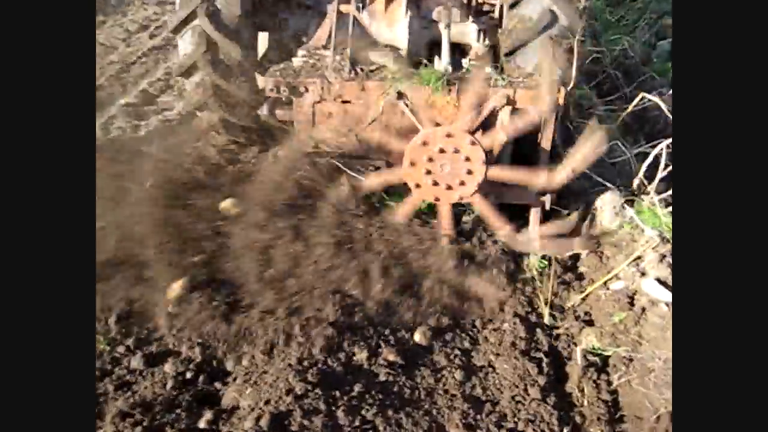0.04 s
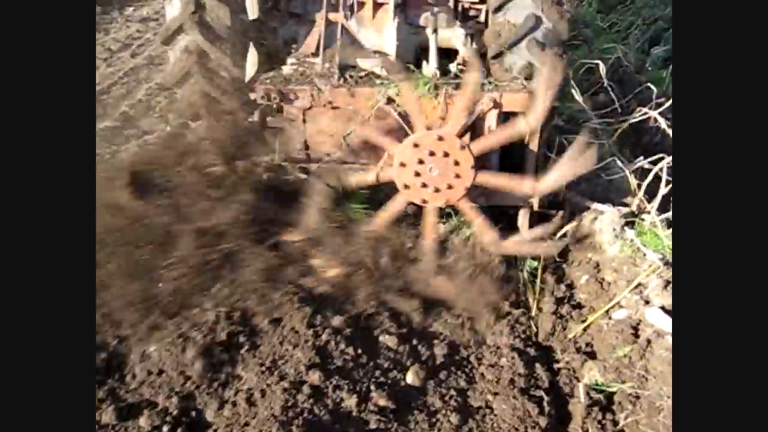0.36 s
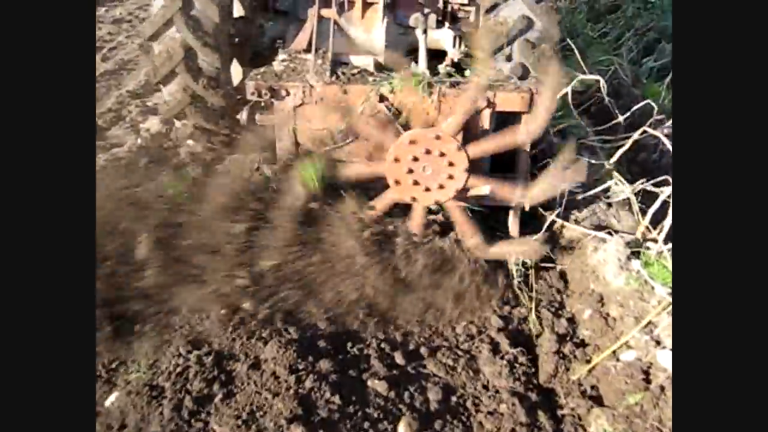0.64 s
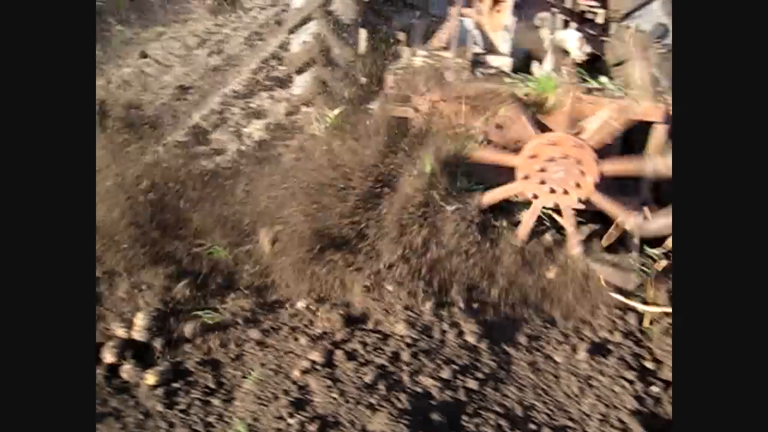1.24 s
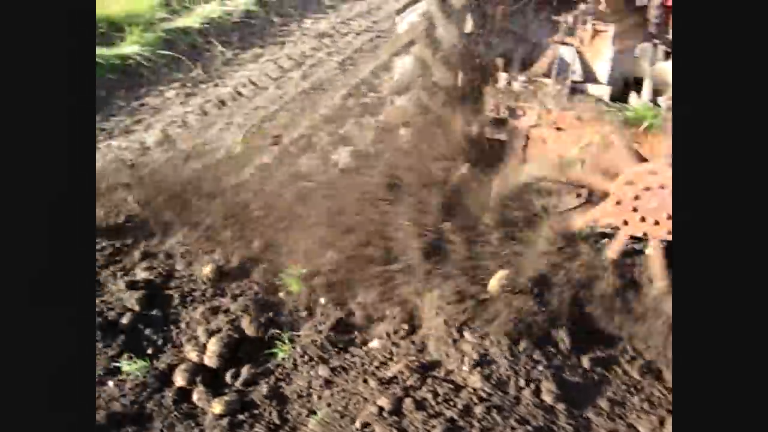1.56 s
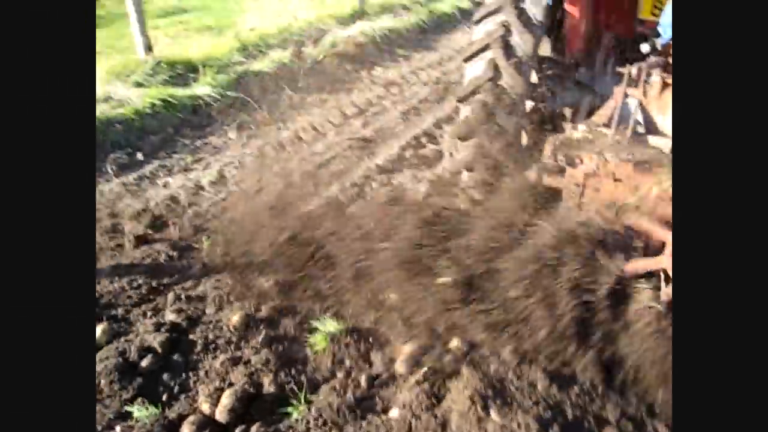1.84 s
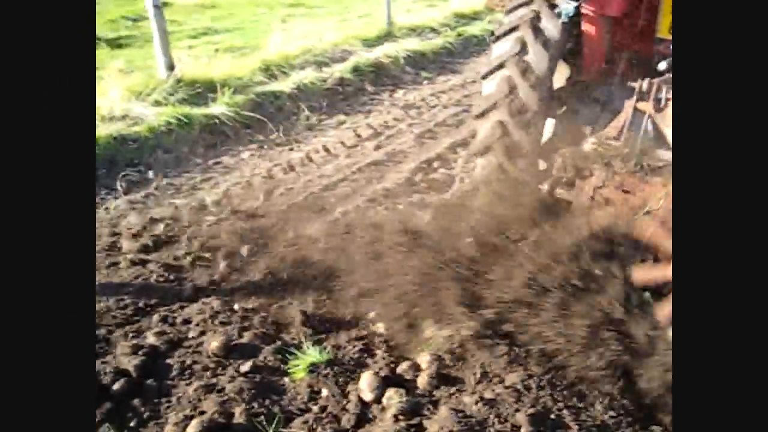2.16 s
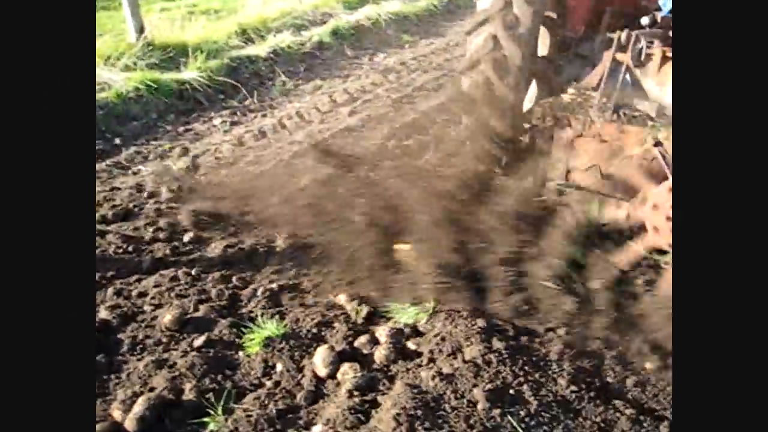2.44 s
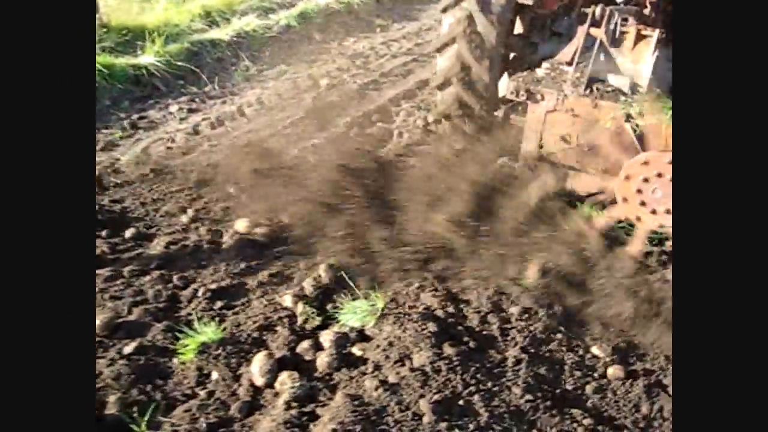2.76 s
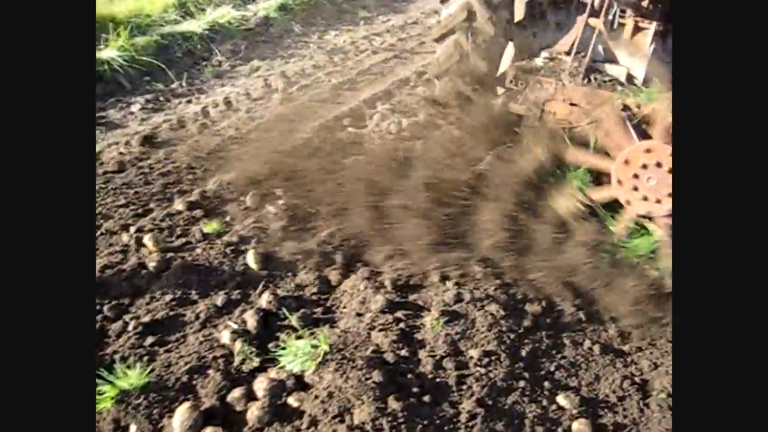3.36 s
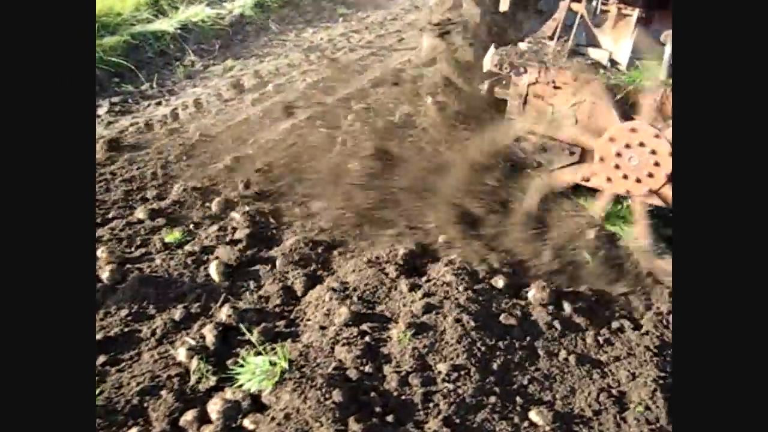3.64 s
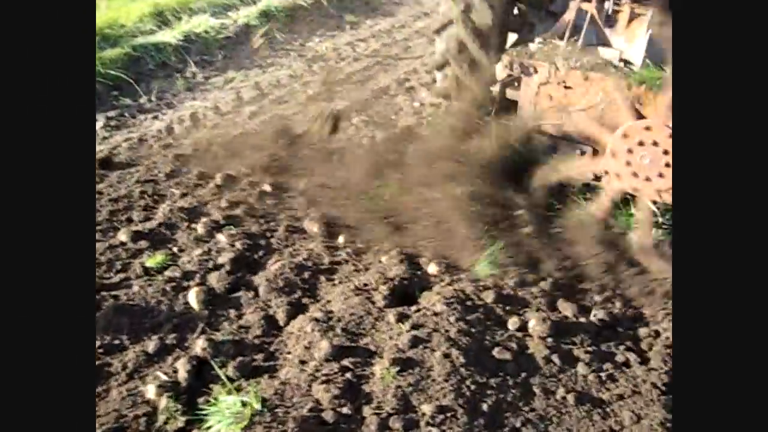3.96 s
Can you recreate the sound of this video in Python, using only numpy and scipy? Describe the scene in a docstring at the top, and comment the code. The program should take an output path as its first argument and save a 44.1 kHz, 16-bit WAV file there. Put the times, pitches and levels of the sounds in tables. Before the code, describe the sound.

A spinning potato digger clatters close by in an open field, throwing showers of soil while stones clack sharply against its steel tines. The tractor engine runs evenly underneath, and the metal frame booms irregularly throughout.

```python
"""An evenly running engine and a shower of earth, close by: a tractor pulls a potato spinner along a ridge.
The exhaust sounds harmonics of the firing rate; thrown soil is the sum of countless small impacts.
The tines bite the ridge and excite the frame's low modes, gravel ticks, stones clack on the steel wheel
and clods burst. A limiter ducks the whole scene after every hard clack."""
import sys
import numpy as np
from scipy import signal
from scipy.fft import rfft, irfft
from scipy.io import wavfile

SR = 44100
rng = np.random.default_rng(int(sys.argv[2]) if len(sys.argv) > 2 else 0)


def generate_wav(signal):
    """Clip the signal to [-1, 1] and save it as 16-bit WAV at the path in sys.argv[1]."""
    frames = np.transpose(np.atleast_2d(signal))
    scaled = np.clip(frames, -1, 1) * 32767
    pcm = np.round(scaled).astype(np.int16)
    wavfile.write(sys.argv[1], SR, pcm)


N = 176400
TIME = np.arange(N) / SR


def from_db(db):
    """Amplitude ratio of a level in decibels."""
    return 10 ** (np.asarray(db) / 20)


def rms_one(x):
    """Normalisation to unit rms."""
    return x / np.sqrt(np.mean(x ** 2) + 1e-20)


def in_time(rows):
    """Linear interpolation of each column over time."""
    s, *columns = np.transpose(rows)
    return [np.interp(TIME, s, c) for c in columns]


def coloured(x, spectrum):
    """Spectral shaping, with a roll-off beyond both ends; unit rms."""
    hz, db = np.transpose(spectrum)
    f = np.maximum(np.arange(N // 2 + 1) * SR / N, 1)
    edges = 1 / np.sqrt((1 + (hz[0] / 2 / f) ** 4) * (1 + (f / hz[-1] / 2) ** 4))
    gain = from_db(np.interp(np.log(f), np.log(hz), db))
    return rms_one(irfft(rfft(x) * edges * gain, N))


def drift(hz):
    """Low-passed noise: a slow random fluctuation of unit rms."""
    r = np.exp(-80 * np.pi * hz / SR)  # computed at SR / 40
    slow = signal.lfilter([1], [1, -2 * r, r * r], rng.standard_normal(N // 40 + 2002))[2000:]
    return np.interp(np.arange(N) / 40, np.arange(len(slow)), rms_one(slow))


def fade(t, t60):
    """Exponential decay, 60 dB in t60 seconds."""
    return np.exp(-np.log(1000) * t / t60)


def ring(x, hz, t60):
    """Forced vibration of one damped mode."""
    r, w = fade(1 / SR, t60), 2 * np.pi * hz / SR
    return signal.lfilter([0, np.sin(w)], [1, -2 * r * np.cos(w), r * r], x)


def struck(modes, t, spread_db):
    """Free vibration after a blow: damped modes of random strength and sign."""
    hz, db, t60 = np.transpose(modes)[:, :, None]
    gain = from_db(db + spread_db * rng.standard_normal(hz.shape)) * rng.choice([-1, 1], hz.shape)
    return np.sum(gain * np.sin(2 * np.pi * hz * t) * fade(t, t60), axis=0)


def add(out, s, sound):
    """Superpose a sound starting at s seconds."""
    i = int(np.clip(s * SR, 0, N - 1))
    out[i:i + len(sound)] += sound[:N - i]


def smooth(x, seconds):
    """First-order lag."""
    r = np.exp(-1 / (seconds * SR))
    return signal.lfilter([1 - r], [1, -r], x)


def engine():
    """Periodic excitation: the firings give exhaust harmonics and one burst of clatter each."""
    # engine speed: (time [s], firing rate [Hz])
    firing = [(0, 33.72), (1.6, 33.74), (2.3, 33.62), (3.65, 33.75), (4, 34.1)]
    # exhaust harmonics: (multiple of the firing rate, rms level [dB])
    exhaust = [(1, -44), (2, -25), (3, -28.5), (4, -34), (5, -43), (6, -36), (7, -34.5), (8, -35),
               (9, -37.5), (11, -37), (12, -55), (13, -40), (14, -29), (15, -49.5), (20, -63)]
    # combustion clatter: (frequency [Hz], relative density [dB])
    knock = [(100, 19), (250, -17), (700, 13), (1500, -29.5), (3000, 40), (8000, 19)]
    cycles = np.cumsum(in_time(firing)[0]) / SR
    tone = np.zeros(N)
    for k, db in exhaust:
        amplitude = np.sqrt(2) * from_db(db + 2.5 * drift(hz=11.6))
        tone += amplitude * np.sin(2 * np.pi * (k * cycles + rng.random()))
    bursts = rng.standard_normal(N) * np.exp(-1.4 * (cycles % 1))
    return tone + from_db(-30.5) * coloured(bursts, knock)


def crumbs(spectrum, per_s=5000):
    """Shot noise: random impacts of uneven size over a wash of fine dust."""
    sizes = from_db(3.6 * np.minimum(rng.exponential(1, N), 5)) * rng.choice([-1, 1], N)
    impacts = rms_one(sizes * (rng.random(N) < per_s / SR))
    dust = 0.43 * rng.standard_normal(N)
    return coloured(impacts + dust, spectrum)


def earth(thud_db, spray_db, grit_db):
    """Amplitude modulation: thuds, spray and grit surge as the wheel throws the soil unevenly."""
    # falling clods, crumbs and grit: (frequency [Hz], relative density [dB])
    thud_spectrum = [(20, -6), (35, 7), (55, -7), (120, 1.5), (180, 3), (260, 5.5), (335, -19.5), (410, 7),
                     (560, 4), (850, 4), (1300, 4.5), (2500, -4.5)]
    spray_spectrum = [(400, -26.5), (900, 1), (1400, 0.5), (2100, 6), (3200, 0), (5000, 1.5), (6300, -9.5),
                      (7500, -12.5), (10000, -52.5)]
    grit_spectrum = [(3000, 2.5), (6000, 6), (7500, 3), (8450, 3.5), (9300, -3.5), (10400, 1.5),
                     (11200, -2.5), (12000, -6), (13500, -1.5), (16000, -35)]
    throw_db = 3.5 * drift(hz=28)
    thuds = from_db(thud_db + 7 + 0.83 * throw_db) * crumbs(thud_spectrum, per_s=900)
    spray = from_db(spray_db - 4.5 + throw_db) * crumbs(spray_spectrum)
    grit = from_db(grit_db + 3 + throw_db + 1.1 * drift(hz=21)) * crumbs(grit_spectrum)
    return thuds + spray + grit


def frame():
    """Resonance: each bite of the tines swells two groups of modes, and the drag keeps them shaking."""
    # tines biting the ridge: (time [s], relative level of low group [dB], of high group [dB])
    bites = [(.068, -3, -14), (.115, -1.5, -26), (.5, -7, -19), (.578, -6, -22), (.615, -20, -24),
             (0.707, -9, -14), (.743, -11, -19), (0.83, -6.5, -14), (1.047, -4.5, -17), (1.479, -8, -15),
             (1.551, -23, -9), (1.689, -9, -9), (1.856, -6.5, -11), (2.036, -16, -9.5),
             (2.106, -13.5, -20.5), (2.408, -12, -15), (2.474, -6.5, -13), (2.685, -8, -2),
             (2.818, -1.5, -8), (2.88, -6.5, -6.5), (2.941, -15, -25), (3.083, -12, -1.5), (3.118, -4, -8),
             (3.276, -14, -12), (3.357, -6, -8), (3.596, -7.5, -13), (3.806, -20, -23), (3.875, -12, -19),
             (3.908, -18.5, -10.5), (3.956, -39, -25)]
    # frame modes: (frequency [Hz], relative level [dB], T60 [s])
    low_modes = [(460.5, -19.5, .13), (479.4, -9, 0.16), (495.7, -8.5, 0.15), (521, -11.5, 0.04)]
    high_modes = [(674, -14, 0.23), (704.3, -5.5, 0.094), (831, -13, 0.071)]
    out, t = np.zeros(N), TIME[:SR // 4]
    rise = 1 - np.exp(-(t / .013) ** 2)
    for s, *levels in bites:
        for modes, bite_db in zip((low_modes, high_modes), levels):
            bend = 1 + 0.0053 * rng.standard_normal()  # the load of soil shifts the pitch
            boom = np.zeros(len(t))
            for hz, db, t60 in modes:
                gain = from_db(db + 2 * rng.standard_normal())
                boom += gain * np.sin(2 * np.pi * hz * bend * t) * rise * fade(t, t60)
            add(out, s, from_db(bite_db + 2) * boom / np.abs(boom).max())
    for modes, shake_db in ((low_modes, -23.5), (high_modes, -24.5)):
        shake = sum(from_db(db) * ring(rng.standard_normal(N), hz, t60) for hz, db, t60 in modes)
        out += from_db(shake_db) * rms_one(shake)
    return out


def gravel(spray_db, per_s=370, count=48):
    """Impulse responses: bits of gravel collide, each tick ringing one of many resonators."""
    # strength of the ticks: (frequency [Hz], relative level [dB])
    spectrum = [(1500, -12.5), (3000, 5.5), (5500, 3), (7500, -0.5), (8500, -5.5), (10500, -9),
                (13000, -20)]
    sizes = from_db(2.7 * np.minimum(rng.exponential(1, N), 4)) * rng.choice([-1, 1], N)
    impacts = sizes * (rng.random(N) < per_s / SR)
    pitches = np.geomspace(1400, 13000, count) * (1 + 0.01 * rng.standard_normal(count))
    gains = from_db(np.interp(pitches, *np.transpose(spectrum)))
    resonator = rng.integers(0, count, N)
    ticks = sum(gains[k] * ring(impacts * (resonator == k) + 1e-18, hz, t60=0.036)
                for k, hz in enumerate(pitches))
    return from_db(spray_db - 7) * rms_one(ticks)


def clacks(hits):
    """Impact of stone on steel: contact noise, a rebound, the stone's partials and the wheel's modes."""
    # contact noise: (frequency [Hz], relative density [dB])
    crack_spectrum = [(300, -19), (900, -15.5), (1800, -5.5), (3200, 2), (5200, -1), (6500, -1),
                      (7600, -13.5), (8500, -8), (10000, -22), (12000, -16.5), (16000, -69)]
    # modes of the steel wheel: (frequency [Hz], relative level [dB], T60 [s])
    wheel_modes = [(1250, -6, 0.098), (1447, -7.5, 0.12), (1778, 2, 0.12), (1964, -2, 0.037),
                   (2500, 3, 0.066), (2984, -1, 0.1), (3617, -21, 0.11), (3900, 5.5, 0.047),
                   (4500, 1, 0.078), (4992, 5, 0.067), (5640, -8, 0.12), (6036, -1, 0.069),
                   (6220, -6.5, 0.029)]
    crack_t60, stone_t60, rebound_s = .034, .026, .0018
    out, t = np.zeros(N), TIME[:SR // 10]
    noise = coloured(rng.standard_normal(N), crack_spectrum)
    onset = int(.003 * SR)  # the first 3 ms set a clack's level
    for s, db, hz in hits:
        start = rng.integers(N - len(t))
        since = t - rebound_s * (.5 + rng.random())
        rebound = from_db(-12) * (since > 0) * fade(np.abs(since), crack_t60 / 2)
        crack = from_db(5.5) * noise[start:start + len(t)] * (fade(t, crack_t60) + rebound)
        cluster_hz = hz * (1 + 0.1065 * rng.standard_normal(3))
        partials = [(hz, 0, stone_t60)] + [(f, -4, stone_t60) for f in cluster_hz]
        stone = from_db(6.5) * struck(partials, t, spread_db=4)
        wheel = from_db(-8.5) * struck(wheel_modes, t, spread_db=5)
        clack = crack + stone + wheel
        add(out, s, from_db(db) * clack / np.std(clack[:onset]))
    return out


def stones():
    """Impulsive excitation: the larger stones strike the tines one by one."""
    # stone impacts: (time [s], relative level [dB], main partial [Hz])
    hits = [(0.004, -2, 5020), (0.0298, 0, 2520), (0.05, -7, 1680), (0.0897, 7, 5500), (0.099, 13, 3520),
            (0.1025, 8, 3750), (0.1406, 2, 3450), (0.1765, 5.5, 5280), (0.2375, 1, 2150),
            (0.2492, 4.5, 4950), (0.268, -6, 3260), (0.312, -3, 3720), (0.344, -2.5, 5050),
            (0.357, -7, 2040), (0.3805, 6.5, 3200), (0.425, 9, 3060), (0.438, 4, 3100), (0.4625, 1, 4160),
            (0.5307, 1, 3900), (0.559, -3, 3380), (0.626, -1.5, 4060), (0.6424, 3.5, 4900),
            (0.6699, 2, 2400), (0.693, 0, 1980), (0.7208, 0, 4910), (0.7826, 6, 4100), (0.8155, -5, 3900),
            (0.827, 1.5, 3880), (0.8485, -2, 6000), (0.8659, 4, 3900), (0.875, 1, 4240),
            (0.8959, 4.5, 4020), (0.9522, 4.5, 4600), (0.957, 7.5, 5620), (1.0271, -3, 2820),
            (1.0385, 3, 4670), (1.1, -0.5, 5000), (1.1488, 4, 4110), (1.207, -2, 3900), (1.2281, 3.5, 4060),
            (1.2635, 3.5, 3060), (1.292, -3.5, 3060), (1.338, -10, 4840), (1.3588, 0.5, 5300),
            (1.4227, 4.5, 3670), (1.449, 4.5, 5260), (1.4995, 2, 4000), (1.513, -30, 2000),
            (1.5314, -3, 4900), (1.5474, 4, 3900), (1.6277, 1, 6030), (1.6412, 6.5, 2920), (1.683, 4, 4600),
            (1.706, 9.5, 5400), (1.7479, 9, 3930), (1.759, -2, 5250), (1.781, 7.5, 3040), (1.813, 0, 1660),
            (1.846, -0.5, 2480), (1.878, -3, 3850), (1.886, 4.5, 4400), (1.9515, -1, 5060),
            (1.9824, 6, 4740), (2.001, 3.5, 2840), (2.02, 2, 5500), (2.039, 3.5, 3880), (2.051, -2, 1790),
            (2.061, 0, 5030), (2.092, -4, 4900), (2.113, -12, 3810), (2.1301, 1, 2500), (2.1475, 4.5, 3700),
            (2.165, 2.5, 6640), (2.2049, 3.5, 2940), (2.2142, -15, 1950), (2.2358, 11, 5240),
            (2.3012, 6.5, 5040), (2.322, -3, 4930), (2.387, 2, 2980), (2.4615, -2, 2240), (2.4818, 3, 5270),
            (2.5341, 3.5, 5460), (2.541, 6, 5830), (2.566, -21, 1800), (2.5885, 1, 5230), (2.625, 0, 5100),
            (2.6708, -19, 5140), (2.6848, 7, 3700), (2.692, 5.5, 4260), (2.758, 1.5, 2380),
            (2.784, -9, 5400), (2.8814, 2.5, 4580), (2.9382, -6, 3230), (2.972, -1.5, 5420),
            (2.999, -1.5, 5000), (3.0228, 6, 2980), (3.048, 6.5, 2500), (3.0854, 5.5, 3470),
            (3.1026, 9, 5680), (3.1707, 8, 2370), (3.189, 2.5, 5050), (3.3039, -0.5, 5300),
            (3.3475, 3.5, 1840), (3.389, -7, 2520), (3.474, -23, 2100), (3.5262, -2.5, 2600),
            (3.541, 2.5, 3900), (3.5565, 2, 2450), (3.58, -0.5, 5140), (3.6017, -5, 3880),
            (3.647, -1, 4100), (3.669, -7.5, 6640), (3.681, -1.5, 5100), (3.7289, -3, 1820),
            (3.769, -11, 5800), (3.839, -23, 4330), (3.8636, -9, 6060), (3.9365, -9.5, 5120)]
    return from_db(-1.5) * clacks(hits)


def pebbles(spray_db, per_s=70, count=400):
    """A Poisson process: small stones rattle through the wheel, their level following the spray."""
    s = np.cumsum(rng.exponential(1, count)) / per_s
    size_db = 4 * np.minimum(rng.standard_normal(count), 2)
    hz = 1700 * 3.6 ** rng.random(count)
    db = np.interp(s, TIME, spray_db) - 8.5 + size_db
    return clacks(np.transpose([s, db, hz])[s < N / SR])


def clods():
    """Fracture: a clod bursts on the tines in a half-sine swell of dull thump and gritty hiss."""
    # bursts: (time [s], thump level [dB], hiss level [dB], duration [s])
    bursts = [(0.243, -16, -33, 0.022), (0.286, -6, -33, 0.021), (0.347, -33, -28, 0.031),
              (1.311, -31, -14, 0.012), (1.365, -38, -11, 0.029), (1.61, -22, -24, 0.027),
              (1.67, -32, -15, 0.015), (2.455, -24, -27, 0.009), (2.98, -20, -29, 0.042),
              (3.277, -13, -16, 0.045), (3.526, -22, -8.5, 0.0088), (3.797, -21.5, -27, 0.067),
              (3.871, -32, -26, 0.026), (3.898, -10.5, -27, 0.028), (3.976, -44, -21, 0.027)]
    # breaking soil: (frequency [Hz], relative density [dB])
    thump_spectrum = [(70, -28), (130, 10), (260, -3), (400, 4), (900, -36), (2000, -11)]
    hiss_spectrum = [(1500, -39), (4000, -7), (8000, 16), (12000, 11.5), (15000, -9)]
    out = np.zeros(N)
    thump, hiss = crumbs(thump_spectrum, per_s=2500), crumbs(hiss_spectrum)
    for s, thump_db, hiss_db, duration in bursts:
        swell = np.sin(np.pi * np.clip((TIME - s) / duration, 0, 1))
        out += swell * (from_db(thump_db) * thump + from_db(hiss_db) * hiss)
    return out


def scene():
    """Superposition in a free field: all sources add in one channel, without reflections."""
    # flying earth: (time [s], relative level of thuds [dB], of spray [dB], of grit [dB])
    earth_levels = [(0, -34.5, -17.5, -40), (.14, -17, -5, -30), (.3, -19.5, -8.5, -19),
                    (.47, -24.5, -10, -35), (.7, -23.5, -13, -26), (.95, -28.5, -10, -32),
                    (1.1, -28, -14, -29.5), (1.36, -27, -10, -21.5), (1.55, -23, -10, -27),
                    (1.85, -23.5, -5, -23.5), (2.1, -23, -13, -27), (2.28, -26.5, -12.5, -25),
                    (2.45, -22, -12.5, -20.5), (2.75, -21, -11.5, -21.5), (3.0, -25, -15, -24),
                    (3.15, -18, -16.5, -31), (3.4, -21, -10.5, -23), (3.9, -25.5, -20, -34)]
    thud_db, spray_db, grit_db = in_time(earth_levels)
    soil = earth(thud_db, spray_db, grit_db) + clods()
    rattle = stones() + pebbles(spray_db)
    return (engine() + frame() + soil + rattle + gravel(spray_db))[None]


def record(dry):
    """Limiting: the gain drops fast and recovers slowly; soft clipping and a low-pass follow."""
    limit_db, release_db_per_s, ceiling, cutoff_hz = -11.5, 64.5, .93, 16000
    level_db = 10 * np.log10(smooth(dry ** 2, seconds=.0016) + 1e-12)
    over_db = np.maximum(level_db - limit_db, 0)
    recovery = release_db_per_s * TIME
    held_db = np.maximum.accumulate(over_db + recovery, axis=-1) - recovery
    ducked = dry * from_db(-smooth(held_db, seconds=.0022))
    clipped = ducked / (1 + (ducked / ceiling) ** 8) ** (1 / 8)
    return signal.sosfiltfilt(signal.ellip(8, .05, 50, cutoff_hz, fs=SR, output="sos"), clipped)


dry = scene()
out = record(dry)
generate_wav(out)
```